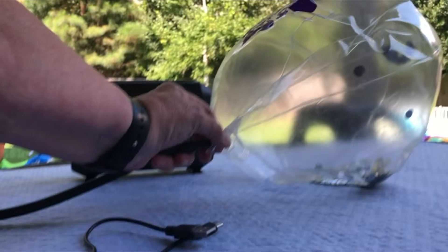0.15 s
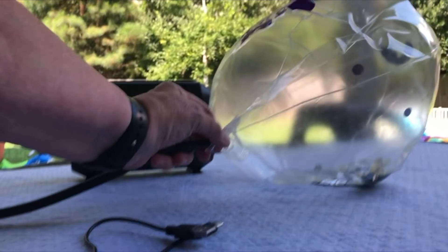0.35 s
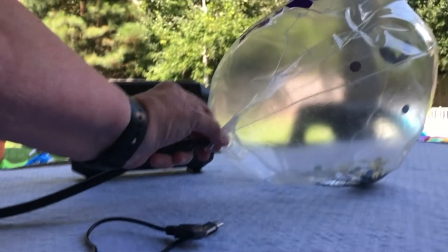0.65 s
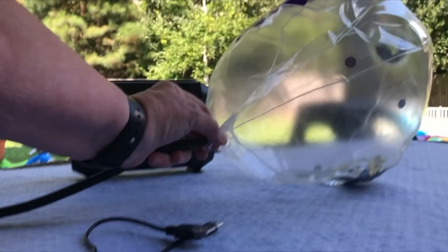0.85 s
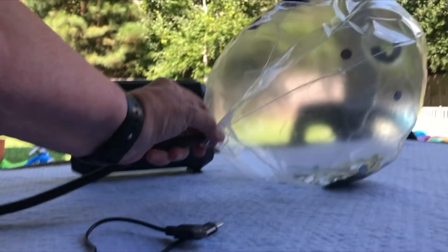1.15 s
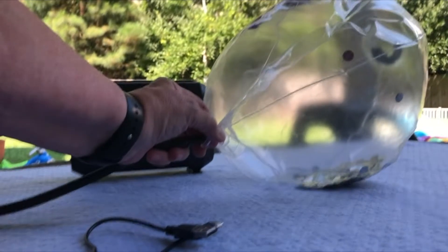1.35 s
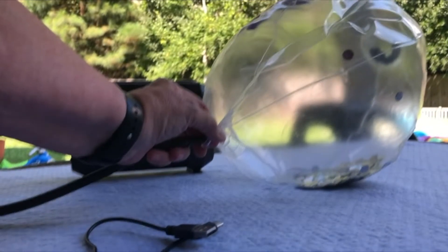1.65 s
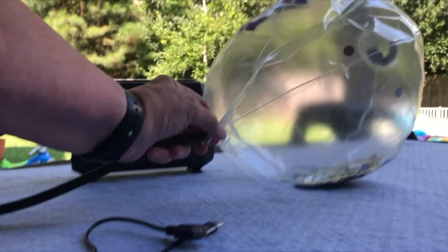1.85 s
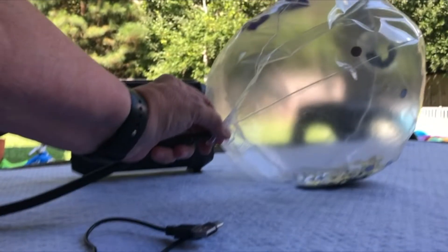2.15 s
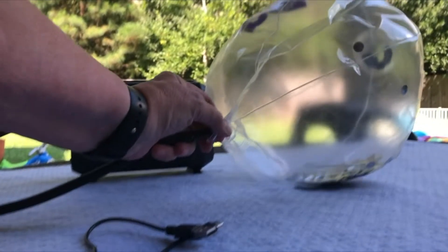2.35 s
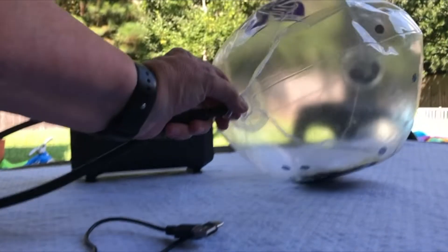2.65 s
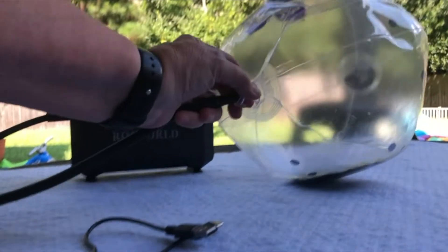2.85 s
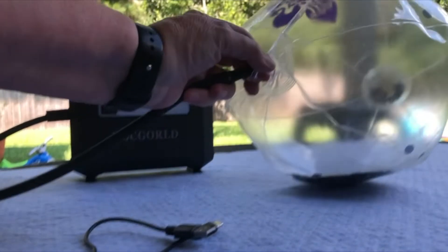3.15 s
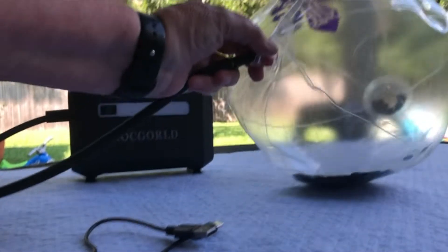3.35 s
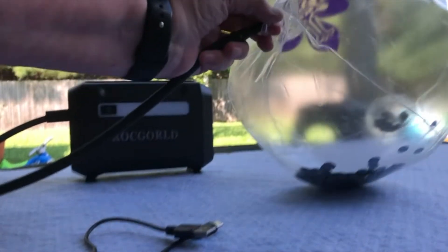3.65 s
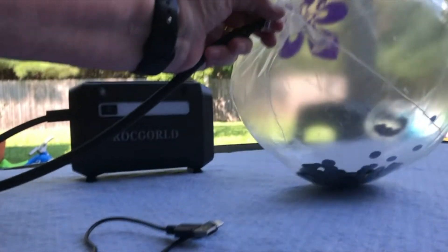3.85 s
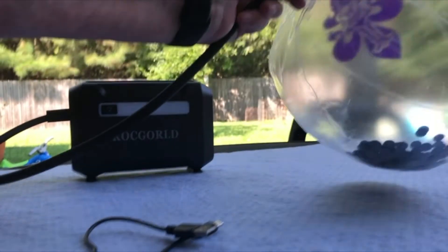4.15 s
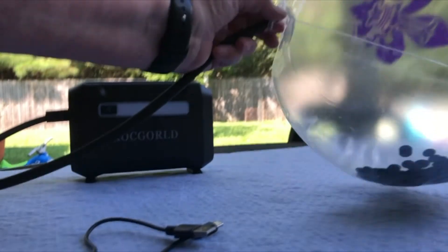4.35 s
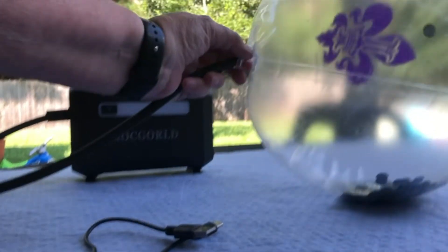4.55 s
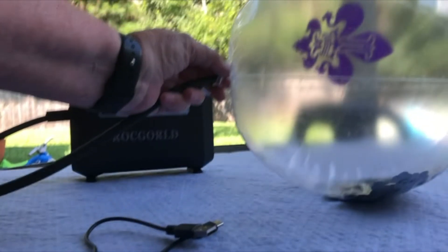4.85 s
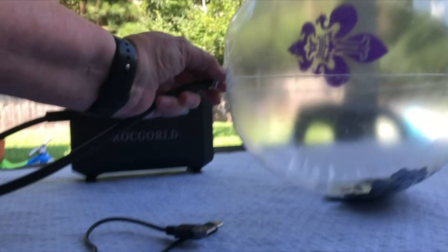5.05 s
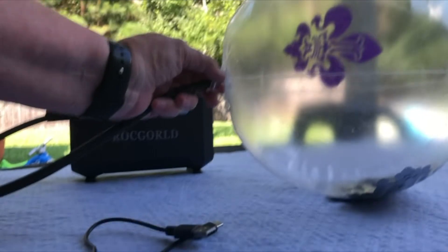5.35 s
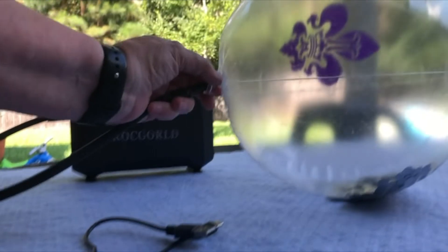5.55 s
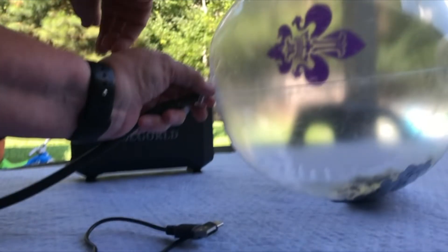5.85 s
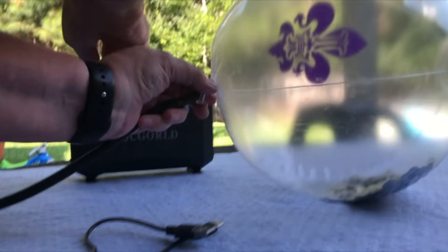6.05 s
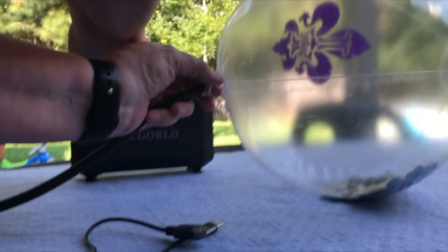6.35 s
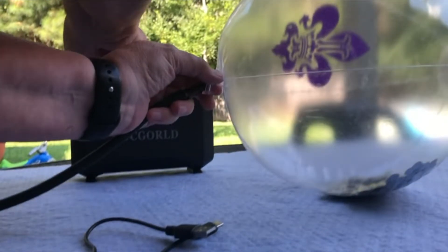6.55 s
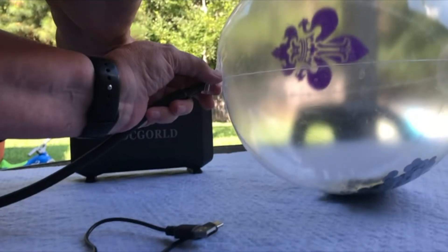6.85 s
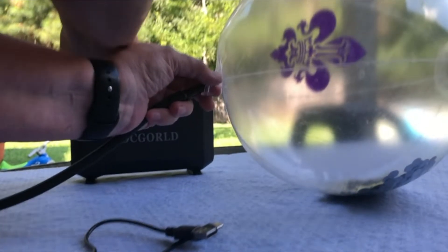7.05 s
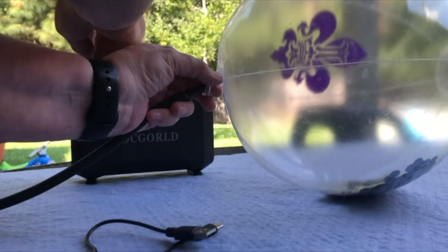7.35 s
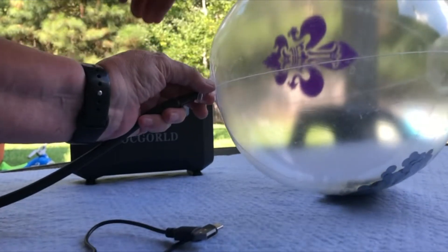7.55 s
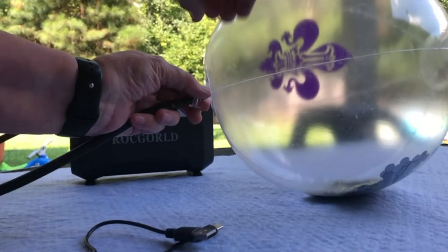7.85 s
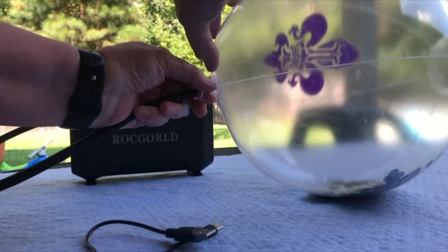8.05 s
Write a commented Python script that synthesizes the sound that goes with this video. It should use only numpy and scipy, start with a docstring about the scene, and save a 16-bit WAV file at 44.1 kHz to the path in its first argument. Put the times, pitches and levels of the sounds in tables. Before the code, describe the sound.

From 0 to 7 seconds a small electric piston compressor runs continuously close to the microphone on an outdoor table. Its rapid chugging, about 47 turns a second, blurs into a harsh buzz with low hum, a gear whine around 2.3 kilohertz and upward, metallic clatter and fluttering valve. Pulsing air hisses brightly above, with a breathy whistle near 5 to 6 kilohertz that swells around 2.2 and 5 seconds and gradually weakens. The hiss shifts around 3 to 4.5 seconds and strengthens near 6.2. A dull pressing rumble joins around 6.5. At 7.0 the motor is switched off; pitch and loudness plunge, individual strokes separating, stopping by 7.4. Soft muffled bumps follow until 7.75, with small dry plastic ticks from 7.4 to 8.05 and a brief finger rub on the ball near 8.1, over a faint low yard murmur.

```python
"""Piston compressor filling a beach ball

A small electric piston compressor on an outdoor table fills a plastic beach ball, then is switched off.
One crank phase drives a humming case, a whining gear, puffs of filtered noise, struck modes and rattling grains.
The motor coasts down in just over a third of a second, as exponential drag and dry friction stop the crank.
Then come soft bumps, short ticks of the plastic and the stick-slip noise of a finger rubbing it; a yard murmurs."""
import sys
import numpy as np
from scipy import signal
from scipy.fft import rfft, irfft
from scipy.io import wavfile
from scipy.ndimage import map_coordinates

SR = 44100
rng = np.random.default_rng(int(sys.argv[2]) if len(sys.argv) > 2 else 0)


def wrap_up_sound(samples):
    """Save the sound to the file named by the first command line argument, as 16-bit audio."""
    columns = np.atleast_2d(samples).T
    # keep every value between -1 and 1, then stretch to whole-number steps
    tamed = np.clip(columns, -1, 1)
    steps = np.round(tamed * 32767).astype(np.int16)
    wavfile.write(sys.argv[1], SR, steps)


N = 361608
T = np.arange(N) / SR


def amp(db):
    """Logarithmic level: decibels to amplitude gain."""
    return 10 ** (np.asarray(db) / 20)


def unit(x):
    """Normalisation to a root-mean-square value of 1."""
    return x / np.sqrt(np.mean(x ** 2) + 1e-20)


def curve(rows):
    """Linear interpolation of a time table at every sample."""
    s, values = np.transpose(rows)
    return np.interp(T, s, values)


def response(points, hz):
    """Transfer function: gain of a spectrum table, interpolated over log frequency."""
    f, db = np.transpose(points)
    return amp(np.interp(np.log(hz + 1), np.log(f + 1), db))


def colour(x, points):
    """Spectral shaping by a spectrum table, normalised to rms 1."""
    gain = response(points, np.fft.rfftfreq(N, 1 / SR))
    return unit(irfft(rfft(x) * gain, N))


def wander(hz):
    """Low-passed Gaussian noise: smooth chance up to about hz, rms 1."""
    lowpass = np.exp(-(np.fft.rfftfreq(N, 1 / SR) / hz) ** 2)
    return unit(irfft(rfft(rng.standard_normal(N)) * lowpass, N))


def per_turn(points, turns):
    """Cyclic modulation: a gain that repeats with the crank angle."""
    angle, db = np.transpose(points)
    return amp(np.interp(turns, angle, db, period=1))


def resonate(x, hz, width):
    """Heterodyne resonator: a one-pole low-pass about the curve hz, with gain 1 at its peak."""
    spin = np.exp(2j * np.pi * np.cumsum(hz * np.ones(len(x))) / SR)
    r = np.exp(-np.pi * width / SR)
    return 2 * (spin * signal.lfilter([1 - r], [1, -r], x / spin)).real


def ring(hz, t60, crack):
    """Impulse response of a blow: an exponentially decaying mode with a short broadband crack on top."""
    t = np.arange(4096) / SR
    mode = np.sin(2 * np.pi * hz * t) * np.exp(-np.log(1000) * t / t60)
    return mode + crack * rng.standard_normal(len(t)) * np.exp(-t / 0.0011)


def strikes(turns, angle, scatter, uneven_db):
    """Jittered impulse train: one blow a turn near a crank angle, with random timing and force."""
    whole = np.arange(1, int(turns[-1] - angle) + 1)
    late, force = rng.standard_normal((len(whole), 2)).T
    at = np.minimum(np.searchsorted(turns, whole + angle + scatter * late), N - 1)
    return np.bincount(at, amp(uneven_db * np.minimum(force, 2)), N)


def gesture(start_s, rise_s, hold_s, fade_db_per_s):
    """Envelope of a hand's action: a sine-squared rise to 1, a hold, then exponential decay."""
    rise = np.sin(np.pi / 2 * np.clip((T - start_s) / rise_s, 0, 1)) ** 2
    return rise * amp(-fade_db_per_s * np.maximum(T - start_s - rise_s - hold_s, 0))


# Close reflections from table, hand and ball: (mean delay [s], gain [ratio])
REFLECTIONS = [(.0009, 0.019), (.0021, -0.46), (.0034, .35), (.0052, -0.31)]


def reflected(x, drift=0.029, drift_hz=0.54):
    """Comb filtering: delayed copies interfere, and their paths drift as hand and ball move."""
    echoes = np.zeros(N)
    for delay, gain in REFLECTIONS:
        source_time = T - delay * (1 + drift * wander(drift_hz))
        echoes += gain * map_coordinates(x, [source_time * SR], order=3)
    return (x + echoes) / np.sqrt(1 + sum(gain ** 2 for _, gain in REFLECTIONS))


OFF_S = 7.031  # the motor is switched off
COAST_S, DRAG_S = .366, .291  # time from switch-off to rest; time constant of the drag
UNLOAD_S = 0.037  # time constant with which the drive lets go of the parts


def coasting():
    """Viscous drag with dry friction: share of full speed, falling to rest after switch-off."""
    age = np.clip(T - OFF_S, 0, COAST_S)
    rest = np.exp(-COAST_S / DRAG_S)
    return np.maximum((np.exp(-age / DRAG_S) - rest) / (1 - rest), 0)


def effort(pace, running_db, unloaded_db, power):
    """Power law of speed: strength of a part, shifted in level as the drive lets go."""
    unloaded = 1 - np.exp(-np.maximum(T - OFF_S, 0) / UNLOAD_S)
    return amp(running_db + unloaded_db * unloaded) * pace ** power


# Start, rise and hold as a hand bears down on the case to work the switch
PRESS_S, PRESS_RISE_S, PRESS_HOLD_S = 6.4, 0.25, 0.32


def sway(turns, pace, level_db=-41, damped_db=-10, lag_s=.05, grip_s=0.26, release_db_per_s=200):
    """Rotating imbalance: the crank rocks the case at its own rate, less while the hand presses on it."""
    pressed = gesture(PRESS_S + lag_s, PRESS_RISE_S, grip_s, release_db_per_s)
    return amp(level_db + damped_db * pressed) * np.sqrt(pace) * np.sin(2 * np.pi * turns)


# Hum of the case: (multiple of the crank rate [1], relative level [dB])
CRANK_ORDERS = [(2, -3), (3, -18.5), (4, -6.5), (5, -15), (6, 2), (7, 2.5), (8, 5.5), (9, 4.5), (10, -9),
                (11, -12), (12, -19.5), (13, -6.5), (14, -14), (15, -6), (16, -8), (17, 3), (18, 0),
                (19, 1.5), (20, 0), (21, 4), (22, -18.5), (23, -6.5), (24, -4.5), (25, -2), (26, -21),
                (28, -6.5), (30, -8), (31, -6), (33, -13.5), (34, -9.5), (36, -15), (37, -10.5)]


def hum(turns, level_db=-36.5, push=0.077, release=.49, waver=0.022):
    """Harmonic synthesis: the piston's push and release, two shoves a turn, set the phase of each order."""
    out = np.zeros(N)
    for order, db in CRANK_ORDERS:
        shoves = np.exp(-2j * np.pi * order * push) + np.exp(-2j * np.pi * order * release)
        out += amp(db) * np.cos(2 * np.pi * order * turns + np.angle(shoves))
    return amp(level_db) * out * (1 + waver * wander(30))


TEETH = 49  # tooth contacts in each turn of the crank
# Load on the gear round one turn: (crank angle [turns], relative level [dB])
GEAR_LOAD = [(0, 2), (.1, -2.5), (.2, -1), (.27, -15.5), (.5, -15), (.76, -32), (.82, -5), (.9, -3.5)]
# Gear whine: (multiple of the tooth rate [1], relative level [dB])
MESH_ORDERS = [(1, -23), (2, -21), (3, -39.5), (4, -44)]
# How well the case radiates the whine: (frequency [Hz], gain [dB])
CASE_RADIATION = [(350, -2), (600, -6), (820, 9.5), (1020, 13), (1220, 13), (1550, 4.5), (1950, 8),
                  (2300, -3), (2900, -2), (4000, 4.5), (4600, -1), (9000, -4.5)]


def gear(turns, pace, slop=0.014, loosen=14, flutter_db=0.8, surge=0.069, dulling=0.65, evening=.7):
    """Gear meshing: load and surge modulate the tooth tones; coasting adds backlash and dulls overtones."""
    backlash = slop * (1 + loosen * (1 - pace)) * wander(129)
    teeth = TEETH * turns + surge * np.sin(2 * np.pi * turns) + backlash
    tooth_hz = TEETH * np.gradient(turns) * SR
    tones = np.zeros(N)
    for order, db in MESH_ORDERS:
        level = amp(db) * pace ** (dulling * (order - 1))
        radiated = response(CASE_RADIATION, order * tooth_hz)
        tones += level * radiated * np.cos(2 * np.pi * order * teeth)
    load = per_turn(GEAR_LOAD, turns) ** (pace ** evening)  # the load evens out as the crank slows
    return np.sqrt(2) * tones * load * amp(flutter_db * (2 - pace) * wander(73))


# The whistle falls in level as the ball fills
WHISTLE_DB, WHISTLE_FADE_DB_PER_S = -35, 1.7
# The jet catches the valve's edge: (centre time [s], half length to 1/e [s], relative level [dB])
WHISTLE_FLARES = [(.86, .04, -41), (2.24, 0.35, -30.5), (3.45, 0.058, -30.5), (4.95, 0.42, -35),
                  (5.7, 0.055, -34)]


def edge_level():
    """Jet-edge coupling: a slowly fading strength, with Gaussian flares where the jet meets the edge."""
    flares = sum(amp(db) * np.exp(-((T - s) / half) ** 2) for s, half, db in WHISTLE_FLARES)
    return amp(WHISTLE_DB - WHISTLE_FADE_DB_PER_S * T) + flares


def whistle(turns, centre_hz=5650, stray=0.09, width_hz=650):
    """Edge tone: resonated noise that moves to a new pitch with every turn."""
    shift = np.clip(rng.standard_normal(int(turns[-1]) + 1), -2, 2)[turns.astype(int)]
    hz = centre_hz * np.exp(stray * shift)
    once = resonate(rng.standard_normal(N), hz, width_hz)
    return unit(resonate(once, hz, width_hz))


# Hiss as the nozzle is moved in the valve: (time [s], relative level [dB])
JET_LEVEL = [(0.0, -36.5), (0.15, -35.5), (2.79, -35.5), (3.0, -32), (3.22, -34), (3.82, -33), (4.05, -37),
             (4.46, -33), (6.18, -29), (6.96, -34), (7.0, -34)]
# Air flow round one turn: (crank angle [turns], relative level [dB])
PUFF_FLOW = [(.04, -10), (.11, -7.5), (.18, -6), (.26, 1.5), (.38, -2.5), (.55, -5.5), (.8, -8)]
# Resonances of the nozzle tube: (frequency [Hz], half width of each filter pass [Hz], relative level [dB])
NOZZLE_MODES = [(5670, 135, -0.5), (5880, 44, -1), (6370, 24, 4), (7030, 220, -5), (7490, 66, 0.5),
                (7990, 110, -3.5), (8510, 78, -2), (8960, 240, -5.5), (9460, 98, -4), (11730, 1070, -10.5)]
# Spectrum of the hiss: (frequency [Hz], relative level per Hz [dB])
HISS_SPECTRUM = [(2500, -19.5), (4000, 6), (5500, 6), (7500, 2), (9300, -6), (10200, -1.5), (11800, -9),
                 (13500, 1.5), (15700, -0.5)]


def air(turns, pace, hiss_db=8, tube_db=5, whistle_db=5, uneven_db=1.0, depth=0.99, parting=0.76):
    """Jet turbulence: puffs modulate hiss, tube modes and edge tone, with deeper contrast at low speed."""
    puffs = per_turn(PUFF_FLOW, turns) ** (depth + parting * (1 - pace))
    flow = puffs * amp(uneven_db * wander(34.9))
    tube = np.zeros(N)
    for hz, half_width, db in NOZZLE_MODES:
        once = resonate(rng.standard_normal(N), hz, 2 * half_width)
        tube += amp(db) * resonate(once, hz, 2 * half_width)
    hiss = reflected(flow * colour(rng.standard_normal(N), HISS_SPECTRUM))
    jet = amp(curve(JET_LEVEL)) * (amp(hiss_db) * hiss + amp(tube_db) * flow * unit(tube))
    return jet + amp(whistle_db) * edge_level() * flow ** 1.18 * whistle(turns)


# Knocks in each turn: (crank angle [turns], relative level [dB], pitch [Hz],
# 60 dB decay time [s], rms scatter of the angle [turns])
KNOCKS = [(0.314, -18.5, 1510, 0.0057, 0.0098), (.33, -20.5, 3990, 0.014, .012),
          (0.421, -20, 865, 0.0046, .006), (0.448, -20.5, 1550, 0.0054, 0.0055),
          (0.511, -25.5, 1013, 0.012, 0.008), (0.619, -31, 1028, 0.012, .007),
          (0.789, -20, 4240, 0.0045, 0.00073), (0.869, -38.5, 1640, 0.0074, 0.012),
          (.93, -23.5, 3910, 0.011, 0.0011)]


def knocks(turns, uneven_db=2.0, crack=0.36, muffle_hz=4800):
    """Impact excitation: valve, rod and bearings strike in each turn; the case muffles their treble."""
    blows = np.zeros(N)
    for angle, db, hz, t60, scatter in KNOCKS:
        impulses = strikes(turns, angle, scatter, uneven_db)
        blows += amp(db) * signal.oaconvolve(impulses, ring(hz, t60, crack))[:N]
    return signal.sosfilt(signal.butter(2, muffle_hz, fs=SR, output="sos"), blows)


REED_FADE_DB_PER_S = 0.55  # the reed flutters less as the ball pushes back


def reed(turns, level_db=-22.5, reed_hz=1830, open_s=0.0087, angle=.31, scatter=0.001, uneven_db=1.0):
    """Reed vibration: the outlet valve flutters as a windowed sine for as long as it stands open."""
    t = np.arange(round(open_s * SR)) / SR
    flutter = np.sin(2 * np.pi * reed_hz * t) * signal.windows.tukey(len(t), .5)
    openings = strikes(turns, angle, scatter, uneven_db)
    return amp(level_db - REED_FADE_DB_PER_S * T) * signal.oaconvolve(openings, flutter)[:N]


# Spectrum of the rattle: (frequency [Hz], relative level per Hz [dB])
RATTLE_SPECTRUM = [(30, -32), (150, -10.5), (300, -19.5), (550, -3.5), (850, 5.5), (1300, -1.5), (1850, 4),
                   (2300, -0.5), (2900, -2), (3900, -2), (4650, 3.5), (5500, -5.5), (8000, -26)]


def rattle(turns, level_db=-27.5, grains_per_s=1500, spread_db=0.24, swing_db=2, loudest_angle=0.34):
    """Shot noise: random grains from brushes and sliding parts, strongest just after the stroke."""
    chance, size = rng.random(N), np.minimum(rng.exponential(1, N), 4)
    sign = rng.choice([-1, 1], N)
    grains = (chance < grains_per_s / SR) * amp(spread_db * size) * sign
    swing = amp(swing_db * np.cos(2 * np.pi * (turns - loudest_angle)))
    return amp(level_db) * colour(grains * swing, RATTLE_SPECTRUM)


def dulled(x, pace, corner_hz=2300, power=0.83):
    """Contact softening: slower blows lose their treble."""
    low = signal.sosfiltfilt(signal.butter(2, corner_hz, fs=SR, output="sos"), x)
    return low + pace ** power * (x - low)


# Spectrum of the yard: (frequency [Hz], relative level per Hz [dB])
YARD_SPECTRUM = [(25, -31), (50, -7), (70, -0.5), (95, -10), (122, 1), (150, -11.5), (205, -3.5),
                 (370, -14), (800, -15.5), (1500, -29), (2400, -35), (4800, -40), (10000, -48),
                 (15500, -45)]


def yard(level_db=-47.5):
    """Stationary ambient noise: the yard's steady murmur, as coloured Gaussian noise."""
    return amp(level_db) * colour(rng.standard_normal(N), YARD_SPECTRUM)


# Spectrum of rumble and pressing: (frequency [Hz], relative level per Hz [dB])
PRESS_SPECTRUM = [(60, -21), (140, -22.5), (215, 1.5), (400, 3), (700, -7.5), (1300, 0), (2500, -43)]
# Spectrum of the bumps: (frequency [Hz], relative level per Hz [dB])
THUD_SPECTRUM = [(35, -24), (60, -6), (80, 16), (130, -12), (250, -6), (450, 3), (750, -13), (1350, -10),
                 (2400, -42), (5000, -51)]
# Soft bumps as the case settles: (time [s], relative level [dB])
BUMPS = [(7.378, -39), (7.425, -39), (7.487, -37), (7.54, -36.5), (7.597, -37), (7.66, -42), (7.745, -44)]


def handling(pace, rumble_db=-44, press_db=-38.0, linger_s=0.17, settle_db_per_s=55, fade_s=0.018, rise_s=0.0016):
    """Structure-borne noise: the case rumbles on the table, is pressed, then bumps softly to rest."""
    pressing = gesture(PRESS_S, PRESS_RISE_S, PRESS_HOLD_S + linger_s, settle_db_per_s)
    level = amp(rumble_db) * pace + amp(press_db) * pressing
    bumps = np.zeros(N)
    for s, db in BUMPS:
        age = np.maximum(T - s, 0)
        bumps += amp(db) * (1 - np.exp(-age / rise_s)) * np.exp(-age / fade_s)
    rumble = level * colour(rng.standard_normal(N), PRESS_SPECTRUM)
    return rumble + bumps * colour(rng.standard_normal(N), THUD_SPECTRUM)


TICK_T60_S, TICK_CRACK = 0.002, .7  # 60 dB decay time of a tick's mode; gain of its crack
RUB_S, RUB_RISE_S, RUB_DB, RUB_FADE_DB_PER_S = 8.02, 0.094, -36.5, 84  # a finger dragged over the ball
# Ticks of the plastic: (time [s], relative level [dB], pitch [Hz])
TICKS = [(7.443, -28, 4160), (7.5085, -42, 3070), (7.6914, -44, 4910), (7.7675, -46.5, 4100),
         (7.858, -35.5, 4600), (7.8674, -36, 3110), (7.9603, -44, 2860), (8.0247, -38, 3010),
         (8.0374, -39, 3980), (8.0456, -35, 3550)]
# Spectrum of the rubbed plastic: (frequency [Hz], relative level per Hz [dB])
SKIN_SPECTRUM = [(150, -8), (500, 2.5), (1800, 2), (2700, -2.5), (3900, 1), (5500, -6.5), (7000, -13.5),
                 (8800, -18), (10500, -25), (15500, -23)]


def ball(tick_db=-8.0, slips_per_s=125, slip_turns=0.33, smear=0.54, stray=.15):
    """Stick-slip friction: a finger excites the taut plastic in decaying bursts; short modes tick."""
    ticks = np.zeros(N)
    for s, db, hz in TICKS:
        tick, part = ring(hz, TICK_T60_S, TICK_CRACK), ticks[round(s * SR):]
        part[:len(tick)] += amp(db + tick_db) * tick[:len(part)]
    slips = np.cumsum(slips_per_s * (1 + stray * wander(40))) / SR
    bursts = smear + np.exp(-(slips % 1) / slip_turns)  # slip_turns is a share of the slip cycle
    level = amp(RUB_DB) * gesture(RUB_S, RUB_RISE_S, 0, RUB_FADE_DB_PER_S)
    return ticks + level * colour(bursts * rng.standard_normal(N), SKIN_SPECTRUM)


START_ANGLE = .69  # crank angle at the start, in turns
CLATTER_FADE_DB_PER_S = 0.22  # rising pressure takes up the play in the parts
# Crank under power, sagging a little as the ball fills: (time [s], speed [turns/s])
POWERED_SPEED = [(0, 46.98), (2.1, 46.989), (3.5, 46.887), (7.02, 46.916)]


def scene():
    """Superposition: all parts of the pump follow one crank phase; the yard murmurs behind."""
    pace = coasting()
    turns = START_ANGLE + np.cumsum(curve(POWERED_SPEED) * pace) / SR
    shake = effort(pace, running_db=-1.83, unloaded_db=-18, power=0.91)
    whine = effort(pace, running_db=0.26, unloaded_db=-5.5, power=0.73)
    flow = effort(pace, running_db=-0.7, unloaded_db=5.0, power=2.05)
    clatter = effort(pace, running_db=1.15, unloaded_db=6.5, power=1.0) * amp(-CLATTER_FADE_DB_PER_S * T)
    pump = sway(turns, pace) + shake * hum(turns) + whine * gear(turns, pace) + flow * air(turns, pace)
    blows = knocks(turns) + reed(turns) + reflected(rattle(turns))
    pump += clatter * dulled(blows, pace)
    return (pump + yard() + handling(pace) + ball())[None]


def record(dry, low_cut_hz=28, band_limit_hz=15780):
    """Linear filtering: the microphone's low cut, then a steep linear-phase band limit."""
    cut = signal.sosfilt(signal.butter(2, low_cut_hz, "highpass", fs=SR, output="sos"), dry)
    band_limit = signal.firwin(1023, band_limit_hz, window=("kaiser", 9), fs=SR)
    return signal.oaconvolve(cut, band_limit[None], "same")


dry = scene()
out = record(dry)
wrap_up_sound(out)
```